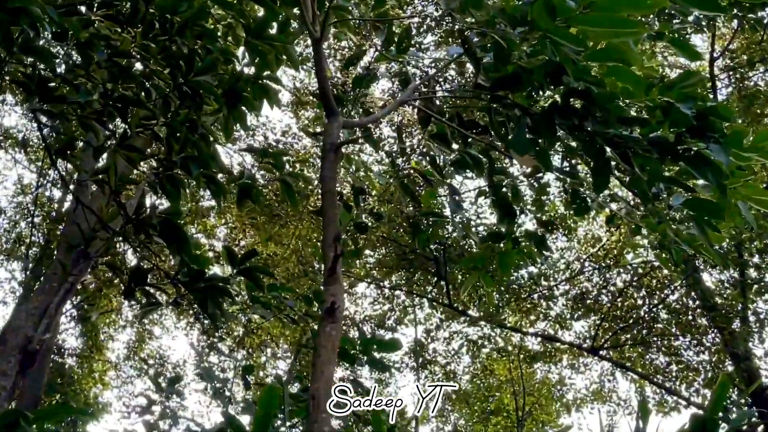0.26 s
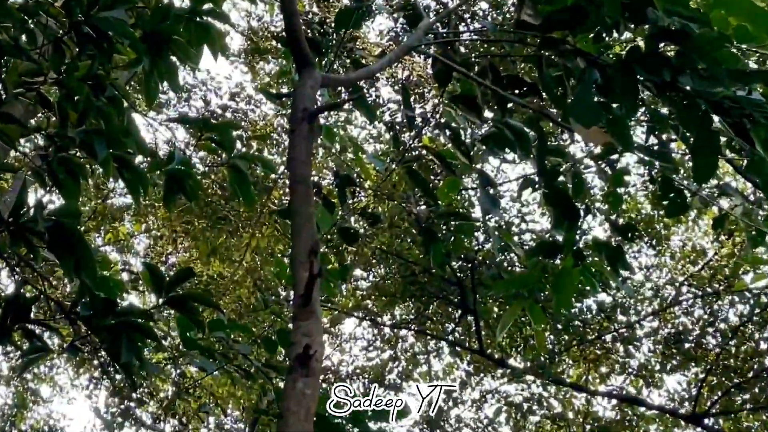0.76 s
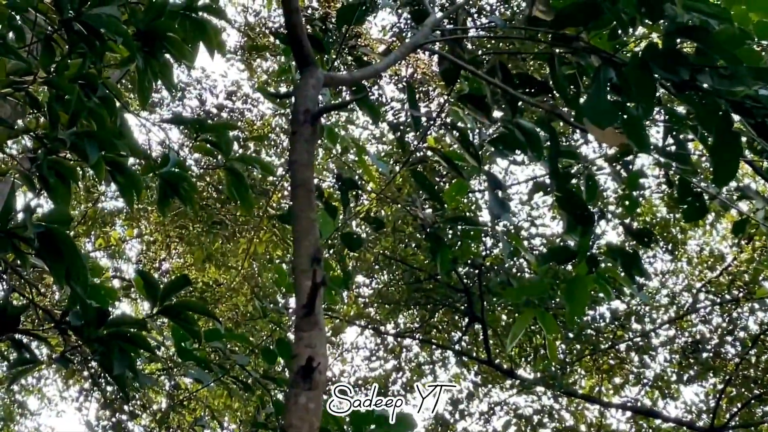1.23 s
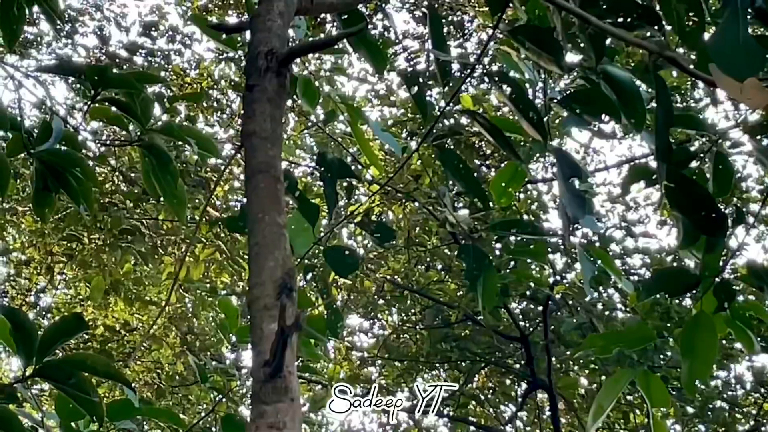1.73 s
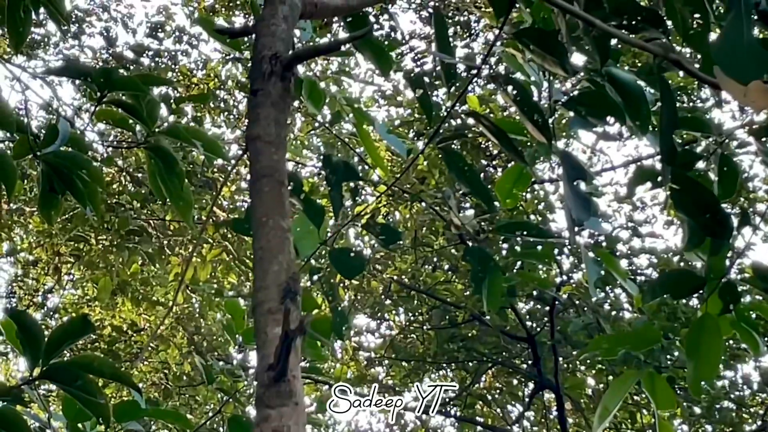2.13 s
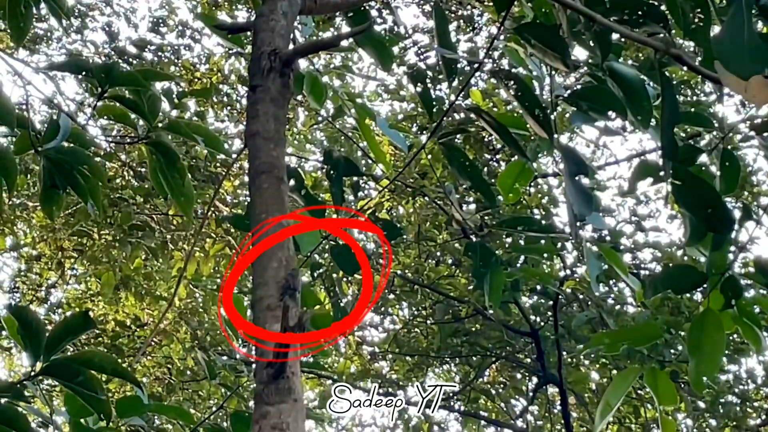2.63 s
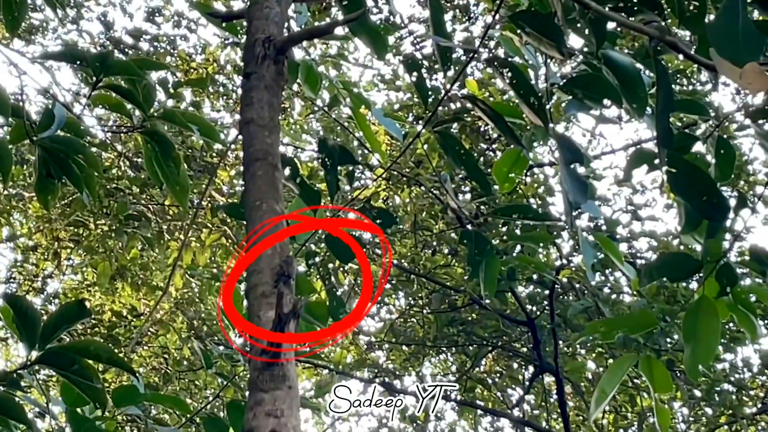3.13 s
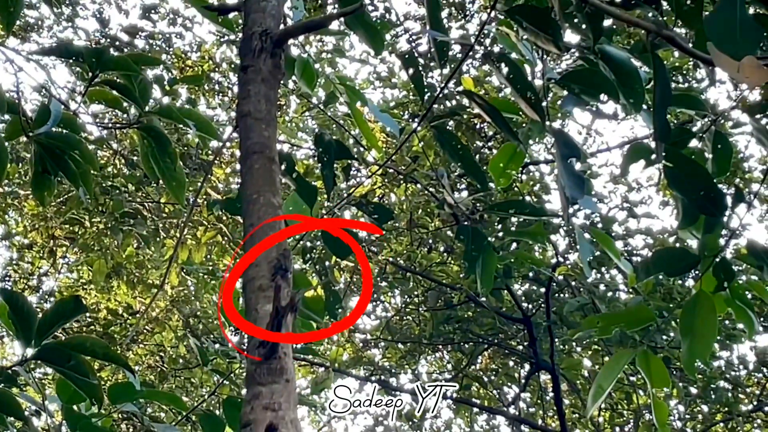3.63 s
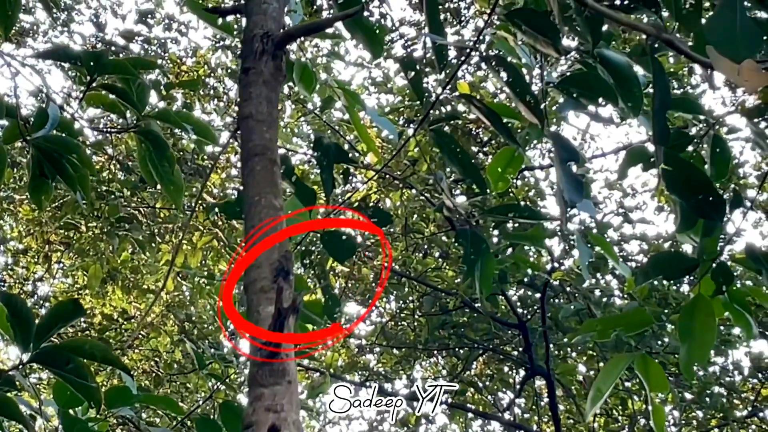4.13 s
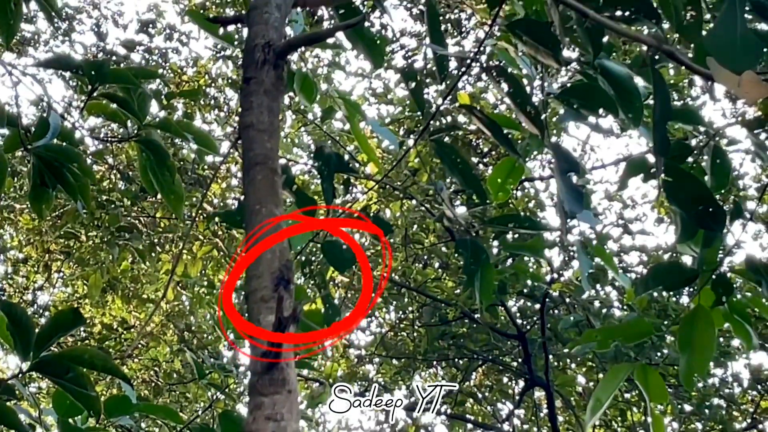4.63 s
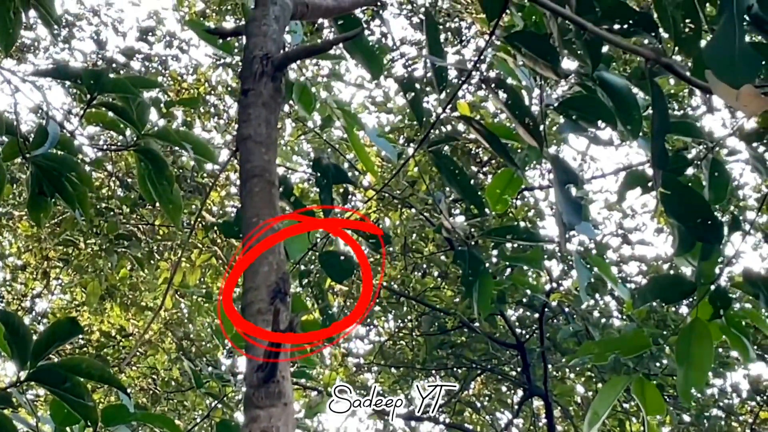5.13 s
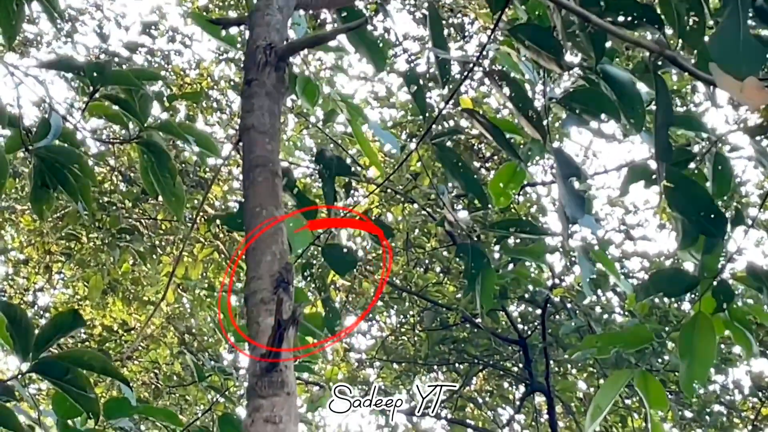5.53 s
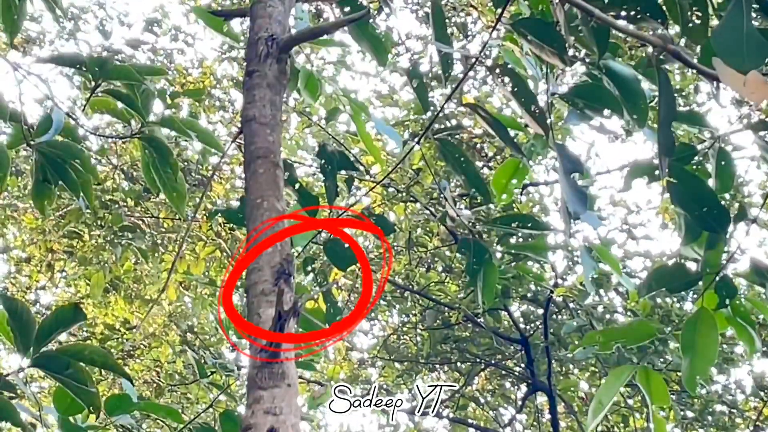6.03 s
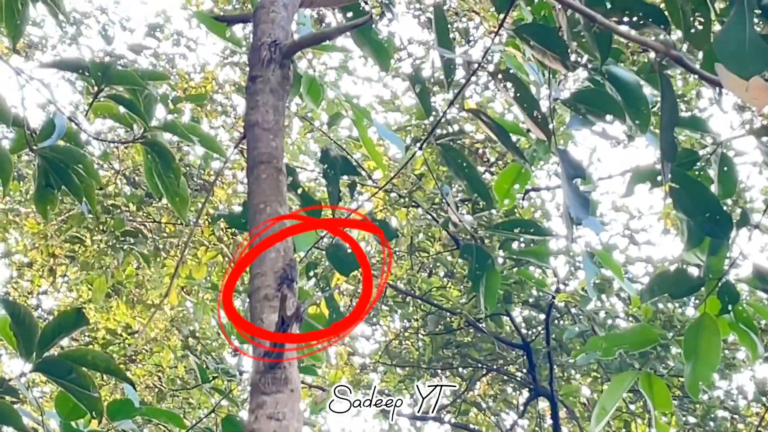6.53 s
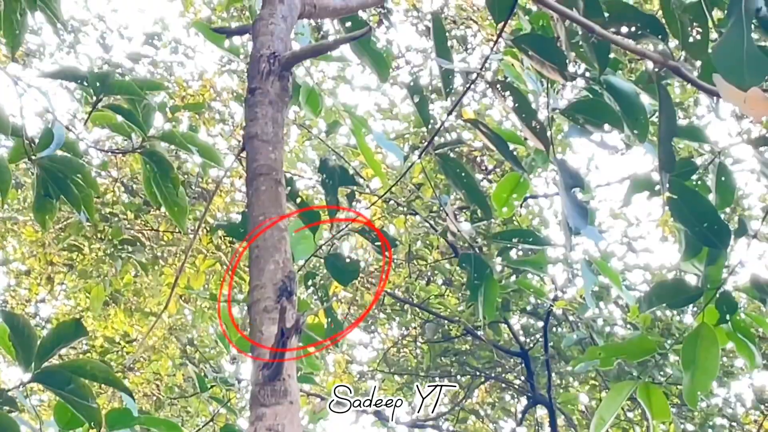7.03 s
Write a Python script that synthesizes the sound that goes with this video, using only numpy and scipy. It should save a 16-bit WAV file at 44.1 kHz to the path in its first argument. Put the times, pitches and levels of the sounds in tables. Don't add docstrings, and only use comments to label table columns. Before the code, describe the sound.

A close cicada buzzes loudly and without pause for just over seven seconds, a piercing, bright ring around five and a half kilohertz made of very rapid clicks. It starts steady, then from about 0.8 to 1.6 seconds its tone sags and pumps in a rapid flutter, about forty pulses a second, the throb easing before the smooth buzz resumes. The same dip comes at 3.7 to 4.6 seconds and again from 6.7 seconds, still unfinished as the sound ends. Far cicadas form a constant thin hiss behind it, and trunks and leaves give a short, diffuse echo. Very quiet low breeze rumble and leaf rustle lie underneath. The handheld microphone adds soft thuds, notably near 0.3 and between 4.3 and 5.1 seconds, and tiny plastic ticks around 1.2, 2.0, 2.4, 3.5 and 4.4 to 4.9 seconds. The stereo is mostly centred, with shifting treble width.

```python
import sys
import numpy as np
from scipy import signal
from scipy.fft import rfft, irfft, next_fast_len
from scipy.io import wavfile
from scipy.ndimage import uniform_filter1d, map_coordinates

SR = 44100
rng = np.random.default_rng(int(sys.argv[2]) if len(sys.argv) > 2 else 0)


def log_audio(samples):
    frames = np.atleast_2d(samples).T
    limited = np.clip(frames, -1, 1)
    pcm = np.round(limited * 32767).astype(np.int16)
    wavfile.write(sys.argv[1], SR, pcm)


def linear_from_db(decibels):
    return 10 ** (np.asarray(decibels, float) / 20)


N = 320607

# (stretch begins [s], release [s], a stroke begins [s], late quickening [strokes/s2])
THROBS = [
    (.81, 1.62, .9108, 9.1),
    (3.735, 4.61, 3.8443, 7.4),
    (6.735, 7.6, 6.8118, 8),
]
PHRASE_S, RELEASE_S = 2.98, 0.86
SLACK_HZ = 5120


def cicada():
    # (time [s], ring [Hz], fall of the ring in a stroke [Hz], level [dB])
    belly = [(0, 5597, 90, -27.5), (.06, 5540, 400, -27.5), (.125, 5600, 930, -26.5),
             (.23, 5617, 1193, -27), (.55, 5330, 860, -26), (.795, 5240, 730, -24), (.825, 5240, 500, -24),
             (.86, 5260, 280, -24), (.9, 5340, 60, -24.5), (1.15, 5450, 48, -24.5), (1.9, 5520, 61, -24.5),
             (2.2, 5530, 82, -25.5)]
    # (time [s], slowest pace [clicks/s], speed-up between strokes [0-1])
    pace = [
        (0, 553, 0),
        (.13, 522, .105),
        (.23, 499, .13),
        (.38, 481, .085),
        (.78, 471, .025),
        (.86, 468, .012),
        (.92, 472, 0),
        (1.15, 477, 0),
        (2.15, 499, 0),
        (2.7, 531, 0),
    ]
    clock = np.arange(N) / SR
    strokes = belly_strokes(clock)
    slowest, speedup = phrase(pace, clock)
    ring_hz, fall_hz, level_db = phrase(belly, clock)
    vigour = speedup / speedup.max()

    lag = 0.045 + 0.18 * (1 - vigour)
    hurry = speedup * np.sin(np.pi * (strokes - lag)) ** 2
    drift = 0.03 * unevenness(ring_hz, fall_hz) * wobble(60)
    count = np.cumsum(slowest * (1 + hurry + drift)) / SR
    click_s = np.interp(np.arange(1, int(count[-1])), count, clock)

    ring_hz, fall_hz, _ = phrase(belly, click_s)
    width_hz = 410 + 0.6 * (ring_hz - SLACK_HZ)
    uneven = unevenness(ring_hz, fall_hz)
    late, louder, higher = rng.standard_normal((3, len(click_s)))
    click_s = np.clip(click_s + uneven * 0.00008 * late, 0, (N - 1) / SR)
    at = (click_s * SR).astype(int)
    stroke, vigour = strokes[at], vigour[at]

    stretch = 1 - np.abs(np.sin(np.pi * (stroke + 0.13))) ** (2 * 4.47 - 2.6 * vigour)
    ring_hz = ring_hz * (1 + 0.014 * uneven * higher) - fall_hz * stretch
    push = np.cos(2 * np.pi * (stroke - 0.045 * vigour))
    swell_db = 5.5 * (0.64 + 0.35 * vigour) * push * fall_hz / 1000
    size = linear_from_db(3 * uneven * louder + swell_db)

    song = through_body(abdomen_rings(click_s, ring_hz, width_hz, size))
    loudness = np.sqrt(uniform_filter1d(song ** 2, size=SR // 10, mode="reflect") + 1e-12)
    return song / loudness * linear_from_db(level_db - 2.0)


def belly_strokes(s):
    quickens_s, throb_s = 0.35, 0.85
    begin, quicken = np.transpose(THROBS)[2:]
    nearest = np.abs(s[:, None] - begin - throb_s / 2).argmin(axis=1)
    since = s - begin[nearest]
    late = np.clip(since, quickens_s, throb_s) - quickens_s
    return 39.7 * since + quicken[nearest] * late ** 2


def unevenness(ring_hz, fall_hz):
    return np.clip(0.3 + (0.3 * (ring_hz - SLACK_HZ) - 0.28 * fall_hz) / 1000, 0, 1)


def abdomen_rings(click_s, ring_hz, width_hz, size):
    # (multiple of the ring, level [dB], width factor)
    overtones = [
        (1, -0.5, 1.014),
        (2, -30, 4.3),
        (3, -28, 12.3),
    ]
    steps = np.arange(200)
    places = (click_s * SR).astype(int)[:, None] + 1 + steps
    t = places / SR - click_s[:, None]
    rings = 0
    for multiple, db, wider in overtones:
        u = np.pi * wider * width_hz[:, None] * t
        envelope = wider * u ** 2 * np.exp(-1.5 * u)
        rings = rings + linear_from_db(db) * envelope * np.sin(2 * np.pi * multiple * ring_hz[:, None] * t)
    return np.bincount(places.ravel(), (rings * size[:, None]).ravel(), N + len(steps) + 1)[:N]


def through_body(song):
    # (frequency [Hz], level [dB])
    tymbal = [(1500, -52), (3000, -7), (3700, -3.5), (4300, -3), (6200, 4), (7000, -5), (8500, -3)]
    sac_hz, sac_width_hz, sac_db = 5735, 100, 2.5

    def body(hz):
        damping = 1j * hz * sac_width_hz
        sac = 1 + linear_from_db(sac_db) * damping / (sac_hz ** 2 - hz ** 2 + damping)
        return linear_from_db(along(tymbal, hz)) * sac

    return filtered(song, body)


def woods(x):
    t60_s, echo_db = 0.69, -10
    hop, t, wet = SR // 3, np.arange(SR // 2) / SR, np.zeros(N + 2 * SR)
    fade = np.hanning(2 * hop)
    padded = np.pad(x, (hop, 2 * hop))
    for start in range(0, N + hop, hop):
        tail = rng.standard_normal(len(t)) * linear_from_db(-60 * t / t60_s)
        echo = signal.fftconvolve(padded[start:start + 2 * hop] * fade, tail / np.linalg.norm(tail))
        wet[start:start + len(echo)] += echo
    return linear_from_db(echo_db) * wet[hop:hop + N]


def chorus():
    # (frequency [Hz], level per Hz [dB])
    colour = [(1900, -52), (3250, -41), (3950, -20.5), (4400, -14), (4850, -14.5), (5250, -1.5), (5750, -5),
              (6400, -7.5), (6900, -22.5), (7500, -24), (9500, -26.5), (11500, -37), (13500, -39),
              (15300, -22), (16500, -34)]
    # (time [s], level [dB])
    swell = [
        (0, -30.5),
        (1.2, -30.5),
        (2.4, -30),
        (3.6, -30),
        (4.8, -30.5),
        (6, -29.5),
        (7.27, -30.5),
    ]
    ahead, around = rush(colour, patchy_db=1.0)
    gain = linear_from_db(curves(swell)[0] + 0.11 * wobble(2.34))
    return gain * ahead, gain * linear_from_db(-20) * around


def air():
    # (frequency [Hz], level per Hz [dB])
    rumble = [(15, -47), (25, -27), (42, -5), (62, -1.5), (120, -2), (200, -15.5), (300, -14), (440, -120)]
    # (frequency [Hz], level per Hz [dB])
    rustle = [(71, -36), (120, -10), (220, -5.5), (377, -8.5), (446, -7), (527, -10), (1300, -16),
              (2600, -9.5), (3380, -49), (5720, -120)]
    # (frequency [Hz], likeness [0-1])
    alike = [(60, 0.99), (150, 0.92), (600, 0.78), (1400, 0.24), (2600, 0.41)]
    # (time [s], level [dB])
    breeze = [(0, -76.5), (.8, -78.5), (1.05, -82), (1.3, -74.5), (1.55, -80.5), (2.55, -81), (2.95, -89),
              (3.3, -87), (3.56, -78.5), (4, -73), (5.7, -73.5), (6, -76), (6.9, -76), (7.05, -70),
              (7.27, -71.5)]
    # (time [s], thud level [dB])
    grips = [(.32, -67), (1.18, -80), (2.0, -82), (2.43, -81), (4.29, -71), (4.47, -65), (4.92, -65),
             (5.12, -64), (5.37, -79), (5.59, -78), (6.4, -82), (7.04, -71), (7.25, -76)]
    clock = np.arange(N) / SR
    breeze_db = curves(breeze)[0]
    rumble_db = -80 + 0.94 * (breeze_db + 76.5) + 2.5 * wobble(9.8)
    rustle_db = breeze_db + 5.5 + 0.48 * wobble(11)
    thuds = sum(linear_from_db(db) * np.exp(-((clock - s) / 0.022) ** 2) for s, db in grips)
    pair = (linear_from_db(rumble_db) + thuds) * rush(rumble, patchy_db=5.0)
    pair = pair + linear_from_db(rustle_db) * rush(rustle, patchy_db=2.0)

    def shares(hz):
        angle = np.arccos(np.clip(along(alike, hz), -1, 1)) / 2
        return np.array([np.cos(angle), np.sin(angle)])

    mid, side = filtered(pair, shares)
    return np.array([mid + side, mid - side])


def ticks():
    # (time [s], peak level [dB], upper tone level [dB])
    taps = [(1.151, -52, -3), (1.186, -37, -14), (1.988, -51, -4), (2.007, -50.5, -10), (2.407, -45.5, -24),
            (3.457, -52.5, -9), (3.523, -53, -22), (4.431, -45.5, -5), (4.501, -42.5, -28),
            (4.715, -58, -19), (4.882, -36.5, -23)]
    # (frequency [Hz], peaks after [s], half length [s])
    case = [
        (740, 0.0042, 0.0014),
        (1430, 0.0018, 0.001),
    ]
    lead_s, lag_s = 0.002, 0.00016
    out, t = np.zeros(N + SR), np.arange(SR // 20) / SR
    low, high = (np.exp(-((t - peak) / half) ** 2) * np.sin(2 * np.pi * hz * t) for hz, peak, half in case)
    for s, db, upper_db in taps:
        start = round((s - lead_s) * SR)
        out[start:start + len(t)] += linear_from_db(db - 4.0) * (low + linear_from_db(upper_db + 5) * high)
    return np.array([out[:N], np.roll(out, round(lag_s * SR))[:N]])


def unit(x):
    return x / np.sqrt(np.mean(x ** 2) + 1e-20)


def along(points, hz):
    f, v = np.transpose(points)
    return np.interp(np.log(hz + 1), np.log(f + 1), v)


def curves(rows):
    t, *cols = np.transpose(rows)
    return [np.interp(np.arange(N) / SR, t, c) for c in cols]


def phrase(rows, s):
    pins = np.array(THROBS)[:, :2].ravel()
    marks = (PHRASE_S * np.arange(len(THROBS))[:, None] + [0, RELEASE_S]).ravel()
    into = np.interp(s, np.r_[0, pins], np.r_[-pins[0], marks])
    t, *cols = np.transpose(rows)
    return [np.interp(into, t, c, period=PHRASE_S) for c in cols]


def wobble(rate):
    return map_coordinates(rng.standard_normal(int(N * rate / SR) + 4), [np.arange(N) * rate / SR])


def filtered(x, response):
    m = next_fast_len(N + SR // 2)
    return irfft(rfft(x, m) * response(np.fft.rfftfreq(m, 1 / SR)), m)[..., :N]


def rush(spectrum, patchy_db):
    z = signal.stft(rng.standard_normal((2, N)), nperseg=512)[2]
    field = uniform_filter1d(rng.standard_normal(z.shape[1:]), size=6, axis=0)
    field = uniform_filter1d(field, size=12, axis=1)
    pair = signal.istft(z * linear_from_db(patchy_db * unit(field)), nperseg=512)[1][:, :N]
    return unit(filtered(pair, lambda hz: linear_from_db(along(spectrum, hz))))


def scene():
    # (frequency [Hz], phase by which the left leads [rad])
    ports = [(100, -3), (6350, 0.68), (6780, 1), (6950, 4.5), (8150, 1.5), (8800, 2), (9150, 1.5),
             (9750, 0.48), (12200, 2), (13500, 1.5), (15000, 4.5), (15600, 4)]
    opposite = np.array([[1], [-1]])
    song = cicada()
    ahead, around = chorus()
    insects = filtered(song + woods(song) + ahead, lambda hz: np.exp(0.5j * along(ports, hz) * opposite))
    return insects + around * opposite + air() + ticks()


def stereo_picture(x):
    # (from frequency [Hz], sum [0-1], difference [0-1])
    kept = [(0, 1, 1), (1000, .86, .9), (2050, .88, .03), (3000, .95, .1), (3400, 1, 0), (6300, 1, .2),
            (6550, .93, .75), (6830, .33, .75), (7050, .05, .68), (7700, .07, .95), (8200, .4, .95),
            (8600, .9, .85), (9000, 1, .6), (9700, 1, .04), (10300, 1, 0), (11800, .98, .01),
            (12300, .98, .7), (12800, .97, .9), (13250, .5, .97), (13800, .02, 1), (15250, .9, 1)]
    settle_s, top_settles_s, top_hz = 0.3, 1.7, 15760
    hz, t, z = signal.stft([x[0] + x[1], x[0] - x[1]], SR, nperseg=2048)
    band = (3 * np.sqrt(np.arange(len(hz)))).astype(int)
    bands = band[-1] + 1
    centre = ((np.arange(bands) + 0.5) / 3) ** 2 * hz[1]

    treble = (centre > 6000)[:, None]
    luck = rng.standard_normal((2, bands, len(t)))
    luck = luck + 1.6 * treble * rng.standard_normal((2, 1, len(t)))
    luck = uniform_filter1d(luck, size=2, axis=2)
    luck = luck.argsort(axis=2).argsort(axis=2) / len(t)
    f, *often = np.transpose(kept)
    row = np.searchsorted(f, centre[band]) - 1
    keep = luck[:, band] < np.array([share[row] for share in often])[:, :, None]
    keep[0] &= (luck[0, band] < 0.6) | (t > top_settles_s) | (hz[:, None] < 15000)
    keep[1] |= (t < settle_s) & (hz[:, None] < 7000)

    fade = np.clip(1 - (t / settle_s) ** 2, 0, 1) * ((hz > 2500) & (hz < 6500))[:, None]
    z[1] = np.where(fade > 0, fade * (linear_from_db(3.5) * z[1] + 0.13 * z[0]), z[1])
    both, apart = signal.istft(z * keep * (hz < top_hz)[:, None], SR, nperseg=2048)[1][:, :N] / 2
    return np.array([both + apart, both - apart])


def roll_off(x):
    return signal.sosfilt(signal.butter(12, 15990, fs=SR, output="sos"), x)


def record(dry):
    mix = stereo_picture(dry)
    return roll_off(mix)


dry = scene()
out = record(dry)
log_audio(out)
```